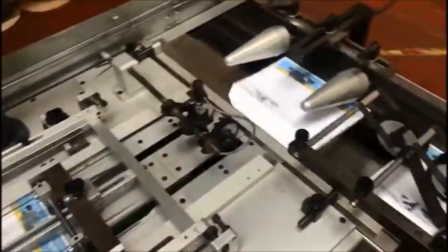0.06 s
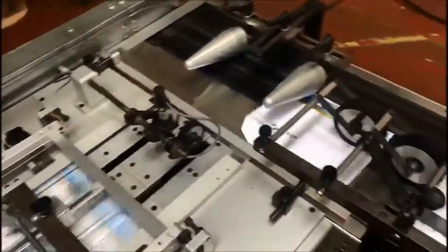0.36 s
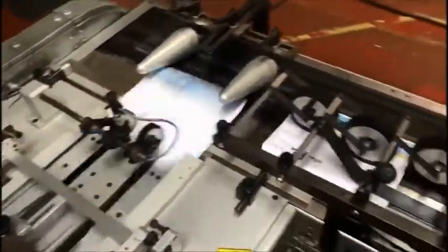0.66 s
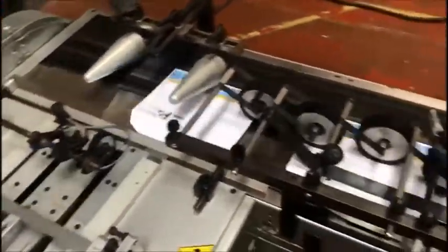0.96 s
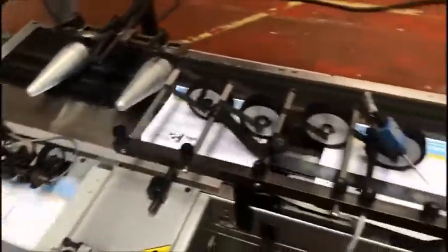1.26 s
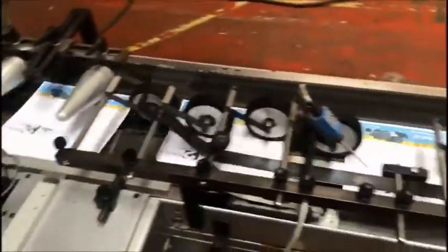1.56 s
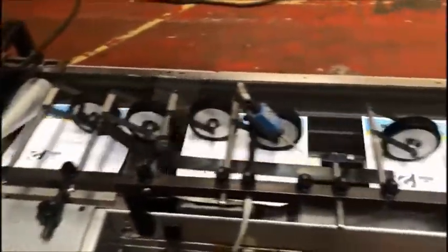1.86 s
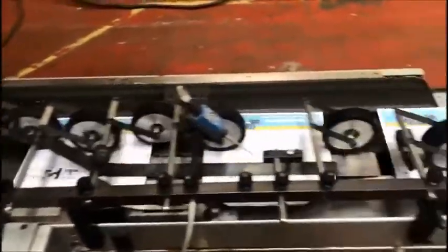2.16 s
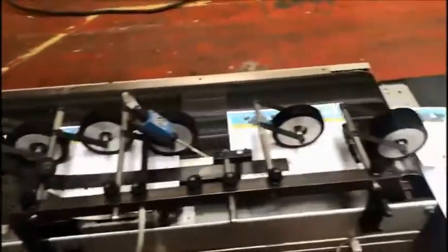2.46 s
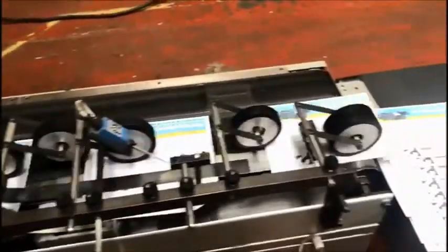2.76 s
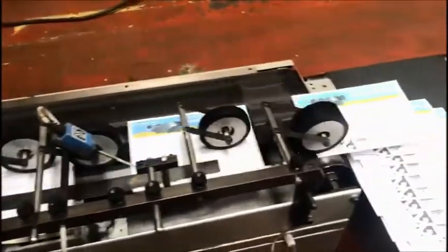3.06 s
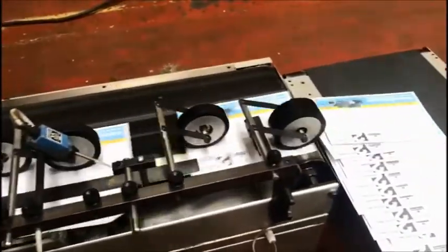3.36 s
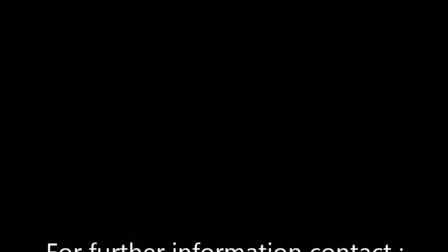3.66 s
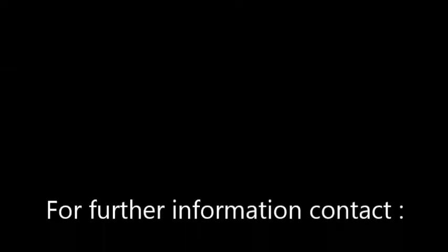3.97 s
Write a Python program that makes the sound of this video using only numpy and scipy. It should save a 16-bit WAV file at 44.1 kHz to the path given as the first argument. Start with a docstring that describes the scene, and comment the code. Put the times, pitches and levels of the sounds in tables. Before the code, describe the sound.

Close to the microphone, a paper handling machine repeats a quick cycle of air hisses, sliding sheets, metal clacks and low knocks. Belts whirr and the drive hums underneath, easing slightly as the microphone moves along it indoors.

```python
"""Envelope inserting machine in a workshop

Close by, one cycle about every 0.72 s: a valve puffs air, paper slides, levers and grippers clack and cams
thump the frame. Underneath, belts whirr, rollers rattle and the toothed belt hums in steady tones. The
microphone drifts along the conveyor, so the running noise eases slightly."""
import sys
import numpy as np
from scipy import signal
from scipy.fft import rfft, irfft
from scipy.io import wavfile

SR = 44100
rng = np.random.default_rng(int(sys.argv[2]) if len(sys.argv) > 2 else 0)


def generate_wav(sig):
    """Save sig (samples, or channels by samples) to the path in sys.argv[1] as 16-bit PCM at SR."""
    pcm = np.round(np.clip(np.atleast_2d(sig).T, -1, 1) * 32767).astype(np.int16)
    wavfile.write(sys.argv[1], SR, pcm)


N = 176400
TREBLE_HZ, TOP_HZ = 3300, 11850


def amp(db):
    """Decibels to gain."""
    return 10 ** (np.asarray(db) / 20)


def unit(x):
    """Scale to rms 1."""
    return x / np.sqrt(np.mean(x ** 2))


def clock():
    """Sample times in seconds."""
    return np.arange(N) / SR


def band(x, lo_hz, hi_hz):
    """Band-pass filter."""
    return signal.sosfilt(signal.butter(2, [lo_hz, hi_hz], "band", fs=SR, output="sos"), x)


def colour(x, points):
    """Filter by (freq_hz, gain_db) points; output at rms 1."""
    hz, db = np.array(points, float).T
    bins_hz = np.maximum(np.arange(N // 2 + 1) * SR / N, 1)
    gain = amp(np.interp(np.log(bins_hz), np.log(hz), db))
    return unit(irfft(rfft(x) * gain, N))


def convolve(x, response):
    """Apply an impulse response."""
    return signal.fftconvolve(x, response)[:N]


def walk(rate_hz):
    """Random wander, spread near 1."""
    knots = rng.standard_normal(1024)
    return np.interp(clock() * rate_hz, np.arange(len(knots)), knots)


def tone(hz):
    """Sine on a pitch curve, rms 1."""
    return unit(np.sin(2 * np.pi * np.cumsum(hz) / SR))


def grit(spread_db):
    """Dense tiny contacts of uneven strength."""
    return unit(rng.standard_normal(N) * amp(spread_db * np.minimum(rng.exponential(size=N), np.pi)))


def burst(start_s, rise_s, fall_s):
    """Envelope: linear attack, exponential release."""
    age_s = clock() - start_s
    return np.clip(age_s / rise_s, 0, 1) * np.exp(-np.clip((age_s - rise_s) / fall_s, 0, 50))


def ringing(modes):
    """Half a second of decaying modes."""
    t = clock()[:SR // 2]
    return sum(amp(db) * np.sin(2 * np.pi * hz * t) * np.exp(-np.log(1000) * t / t60_s)
               for hz, db, t60_s in modes)


def blows(events, modes, gain_db, build_s):
    """Soft blows: vibration builds up through a heavy part and rings out."""
    pushes = np.zeros(N)
    for start_s, db in events:
        pushes[int(start_s * SR)] += amp(db + gain_db)
    response = ringing(modes)
    response *= 1 - np.exp(-clock()[:len(response)] / build_s)
    return convolve(pushes, 2 * response / np.abs(response).max())


def workshop(x, tail_db=-9, t60_s=0.31, delay_s=0.008):
    """The walls add a short, dull tail."""
    t = clock()
    tail = band(rng.standard_normal(N), 180, 4940) * np.exp(-np.log(1000) * t / t60_s) * (t > delay_s)
    return x + amp(tail_db) * np.std(x) * unit(convolve(x, tail))


def drive(flicker_db=3.5, waver_hz=2.007):
    """Steady tones of the toothed belt's meshing, each wavering a little."""
    # steady tones: pitch_hz, level_db
    tones = [(172.5, -39.5), (264, -45.5), (856, -47.5), (3010, -50.5), (3084, -56), (4382, -53),
             (4554, -50), (7354, -55), (7526, -53)]
    return sum(amp(db + flicker_db * walk(rate_hz=8.3)) * tone(hz + waver_hz * walk(rate_hz=14))
               for hz, db in tones)


def belt(tooth_hz=85.66, level_db=-41, scatter_db=2, waver=0.00068):
    """A toothed belt meshes with its pulley: the same rasp at every tooth makes a faint buzz."""
    # buzz spectrum: freq_hz, gain_db
    spectrum = [(400, -13.5), (1500, -1.5), (3000, 11.5), (4400, 6.5), (7200, -2.5), (11000, -23)]
    size = 4096  # samples in one tooth's rasp
    orders = np.arange(size // 2 + 1)
    strength = amp(-scatter_db * np.clip(rng.standard_normal(len(orders)), -2, 1))
    strength *= (orders > 0) & (orders * tooth_hz < TOP_HZ)
    rasp = irfft(strength * np.exp(2j * np.pi * rng.random(len(orders))), size)
    teeth = np.cumsum(tooth_hz * (1 + waver * walk(rate_hz=5.4))) / SR
    buzz = np.interp(teeth % 1 * size, np.arange(size), rasp)
    return amp(level_db) * colour(buzz, spectrum)


def roller(centre_s=2.23, width_s=0.12, pitch_hz=4555, level_db=-42.5):
    """A dry roller sings once, rough and rising slightly."""
    rise_hz_per_s, waver_hz, flicker_db = 300, 25, 3.5
    offset_s = clock() - centre_s
    hz = pitch_hz + rise_hz_per_s * offset_s + waver_hz * walk(rate_hz=230)
    swell = np.exp(-(offset_s / width_s) ** 2)
    return amp(level_db + flicker_db * walk(rate_hz=43)) * swell * tone(hz)


def panels(x, spacing_hz=45, ripple_db=1.8):
    """Sheet-metal covers favour many narrow pitches, mostly in the treble."""
    hz = np.arange(N // 2 + 1) * SR / N
    ripple = np.interp(hz / spacing_hz, np.arange(1024), rng.standard_normal(1024))
    gain = amp(ripple_db * ripple * np.minimum(hz / TREBLE_HZ, 1))
    return unit(irfft(rfft(x) * gain, N))


def conveyor(taps_per_s=71, tap_spread_db=3.5, tap_decay_s=0.0081, rattle_db=-14.5):
    """Belts whirr; rollers and chain links rattle at random."""
    # belt noise spectrum: freq_hz, gain_db
    whirr_spectrum = [(25, -34.5), (40, -28.5), (60, -6.5), (110, 0.5), (165, 2), (220, -6), (390, -2.5),
                      (510, -11), (620, -5), (1000, -7.5), (1500, -6.5), (2400, -10), (3400, -15.5),
                      (5300, -13.5), (8200, -17), (11300, -20.5)]
    # roller and chain spectrum: freq_hz, gain_db
    rattle_spectrum = [(100, -15), (300, 3.5), (900, -5), (2200, 5), (3800, 0.5), (7000, -12.5),
                       (11500, -20.5)]
    # running noise along the conveyor: time_s, level_db, treble_boost_db
    drift = [(0, -25.5, 2.5), (.7, -25.5, 3), (1.4, -25.5, 2.5), (2.1, -27, 2.5), (2.801, -27, 1.5),
             (3.6, -27, 1)]
    t = clock()
    hits = rng.random(N) < taps_per_s / SR
    taps = hits * amp(tap_spread_db * np.minimum(rng.exponential(size=N), 3))
    shaking = convolve(taps, np.exp(-t[:SR // 10] / tap_decay_s))
    rattle = colour(shaking * rng.standard_normal(N), rattle_spectrum)
    whirr = panels(colour(rng.standard_normal(N), whirr_spectrum))
    whirr *= amp(walk(rate_hz=68))  # about 1 dB of flicker
    running = whirr + amp(rattle_db) * rattle
    time_s, level_db, boost_db = np.array(drift).T
    treble = signal.sosfiltfilt(signal.butter(1, TREBLE_HZ, "high", fs=SR, output="sos"), running)
    extra_treble = (amp(np.interp(t, time_s, boost_db)) - 1) * treble
    return (running + extra_treble) * amp(np.interp(t, time_s, level_db))


def cams():
    """Cams thump the frame."""
    # thumps: start_s, level_db
    thumps = [(.047,-22), (.571,-21.5), (.686,-24.5), (.770,-23), (.856,-28.5), (1.293,-29), (1.406,-22),
              (1.488,-25.5), (2.025,-26), (2.128,-21), (2.207,-26.5), (2.85,-23.5), (2.931,-32), (3.44,-26),
              (3.572,-26.5)]
    # frame modes: pitch_hz, gain_db, t60_s
    modes = [(124.1, -9, 0.211), (148.6, -1.5, .12), (163.5, 1.5, 0.14), (330, -3.5, 0.099)]
    return blows(thumps, modes, gain_db=0.5, build_s=0.0084)


def feed_arm():
    """The feed arm knocks with a hollow ring."""
    # knocks: start_s, level_db
    knocks = [(.489, -27.5), (.682, -26.5), (.866, -44), (1.205, -25.5), (1.92, -26), (3.368, -31)]
    # arm modes: pitch_hz, gain_db, t60_s
    modes = [(249.4, 3.34, 0.1), (283, 8.1, 0.072), (396, 3.1, 0.075)]
    return blows(knocks, modes, gain_db=3, build_s=0.0037)


def paper(gain_db=3.5, rise_s=0.013, fall_s=0.0075):
    """Sheets scrape briefly along their guides."""
    # slides: mid_rise_s, level_db
    slides = [(.491, -23), (.555, -20), (1.277, -21), (1.894, -26), (1.992, -21.5), (2.72, -28),
              (3.328, -26.5), (3.441, -23.5)]
    # scrape spectrum: freq_hz, gain_db
    spectrum = [(150, -10), (450, 0), (1000, -7), (1900, 3), (3500, -7.5), (6000, -6), (11500, -19.5)]
    swell = sum(amp(db + gain_db) * burst(mid_s - rise_s / 2, rise_s, fall_s) for mid_s, db in slides)
    return swell * colour(grit(spread_db=5), spectrum)


def valve(hiss_db=4, rise_s=0.0065, tail_db=-10.5, whistle_lag_s=0.0055):
    """Air escapes in a short hiss; just after, the port whistles with a fluttering pitch."""
    # air puffs: start_s, level_db
    puffs = [(0.178, -22.5), (0.9, -25), (1.62, -25.5), (2.342, -25), (3.066, -26.5)]
    # hiss spectrum: freq_hz, gain_db
    spectrum = [(2000, -32.5), (4300, -18), (5400, 6.5), (6500, -2.5), (8000, -6), (9000, 2), (10000, -1.5),
                (11000, 4.5), (11600, -6)]
    # port resonances: pitch_hz, width_hz, gain_db
    resonances = [(5560, 140, -1.5), (11200, 320, -1.5)]
    flow, whistle_swell = np.zeros((2, N))
    for start_s, db in puffs:
        tail = amp(tail_db) * burst(start_s, rise_s, fall_s=0.041)
        flow += amp(db) * (burst(start_s, rise_s, fall_s=0.02) + tail)
        whistle_swell += amp(db) * burst(start_s + whistle_lag_s, rise_s=0.0046, fall_s=0.019)
    whistle = sum(amp(db) * tone(hz + width_hz / 2 * walk(rate_hz=240))
                  for hz, width_hz, db in resonances)
    hiss = amp(hiss_db) * colour(rng.standard_normal(N), spectrum)
    return flow * hiss + whistle_swell * whistle


def pings(rise_s=0.0012, fall_s=0.0023):
    """Small struck parts give one short note each."""
    # notes: start_s, pitch_hz, level_db
    notes = [(.045, 1560, -15.5), (.421, 1420, -12), (.500, 2320, -6.5), (.660, 560, -25.5),
             (1.248, 1930, -15.5), (1.293, 2800, -14.5), (1.376, 526, -18), (1.914, 2800, -16.5),
             (1.932, 2750, -17.5), (2.014, 650, -10), (2.105, 545, -9), (2.658, 645, -16.5),
             (2.820, 2770, -17.5), (3.540, 2650, -15), (3.541, 640, -17)]
    t = clock()
    return sum(amp(db) * burst(start_s, rise_s, fall_s) * np.sin(2 * np.pi * hz * (t - start_s))
               for start_s, hz, db in notes)


def strikes():
    """Steel hits its stop: a hard crack of a few milliseconds."""
    # impacts inside the loudest clacks: start_s, level_db
    impacts = [(0.447, -11), (0.4982, -11), (.5785, -5), (1.2952, -8.5), (2.0136, -8.5), (3.4573, -10.5),
               (3.4632, -10.5)]
    force = sum(amp(db) * burst(start_s, rise_s=1 / SR, fall_s=0.0011) for start_s, db in impacts)
    return force * unit(band(np.sign(rng.standard_normal(N)), lo_hz=1100, hi_hz=7500))


def clacks(attack_s=0.0019, tail_s=0.025, tail_db=-9, lever_db=-10):
    """Levers and grippers chatter as they meet: three noise bands that also ring the lever modes."""
    # contacts: start_s, body_db, ring_db, snap_db, contact_s
    contacts = [(0.144,-27.5,-38.5,-41,0.005), (0.358,-36,-26.5,-35,0.0067), (0.444,-30,-20,-25.5,0.0083),
                (0.501,-31.5,-21,-28,0.0079), (0.573,-28,-17,-17,0.01), (0.651,-26.5,-32,-43,0.013),
                (0.679,-35.5,-23,-37.5,0.0037), (0.763,-31,-31.5,-43.5,0.014), (0.858,-31,-38.5,-42,.007),
                (1.129,-34,-22,-38.5,0.0045), (1.166,-26.5,-26,-29,0.0086), (1.203,-37,-27,-33,0.0063),
                (1.292,-19.5,-21.5,-20.5,0.0097), (1.337,-33,-26,-33.5,0.004), (1.371,-25.5,-30,-39,0.015),
                (1.907,-27,-26.5,-29,0.0074), (1.923,-35.5,-28.5,-28,0.0061),
                (2.012,-21.5,-18,-22.5,0.0015), (2.025,-24,-25,-31.5,0.0096), (2.1,-26,-23.5,-39.5,0.011),
                (2.604,-30.5,-27,-29.5,0.013), (2.651,-28,-27,-35.5,0.011), (2.742,-31.5,-27.5,-37,0.011),
                (2.815,-25,-24,-29.5,0.011), (3.369,-28,-27.5,-37,0.02), (3.455,-28,-25.5,-22.5,0.014),
                (3.534,-25.5,-27.5,-34.5,0.016)]
    # lever modes: pitch_hz, gain_db, t60_s
    modes = [(340, -9, 0.095), (605, 1, 0.16), (718, 6.5, 0.066), (1373, -5.5, 0.088), (1742, 7.5, 0.032),
             (2345, 2, 0.035), (2945, 3, 0.04)]
    bands_hz = [(246, 1040), (1040, 3233), (3233, TOP_HZ)]  # body, ring, snap
    trims_db = np.array([0.5, 0, 1.5])
    forces = np.zeros((3, N))
    for start_s, *levels_db, contact_s in contacts:
        shape = burst(start_s, attack_s, contact_s) + amp(tail_db) * burst(start_s, contact_s, tail_s)
        forces += amp(trims_db + levels_db)[:, None] * shape
    chatter = sum(force * unit(band(grit(spread_db=1.5), *edges_hz))
                  for force, edges_hz in zip(forces, bands_hz))
    lever_ring = unit(convolve(chatter, ringing(modes)))
    return chatter + amp(lever_db) * np.std(chatter) * lever_ring


def scene():
    """The whole machine, the same in both channels."""
    mechanism = workshop(clacks() + strikes() + pings() + paper() + valve())
    mono = mechanism + cams() + feed_arm() + conveyor() + belt() + drive() + roller()
    return np.array([mono, mono])


def record(dry, low_cut_hz=34, ceiling=0.75, stop_s=3.656):
    """A small microphone drops deep bass; loud peaks are gently rounded; dead stop, then a steep top cut."""
    thin = signal.sosfilt(signal.butter(3, low_cut_hz, "high", fs=SR, output="sos"), dry)
    rounded = thin / (1 + (thin / ceiling) ** 4) ** 0.25
    top_cut = signal.ellip(10, 0.2, 80, TOP_HZ, fs=SR, output="sos")
    return signal.sosfilt(top_cut, rounded * (clock() < stop_s))


dry = scene()
out = record(dry)
generate_wav(out)
```